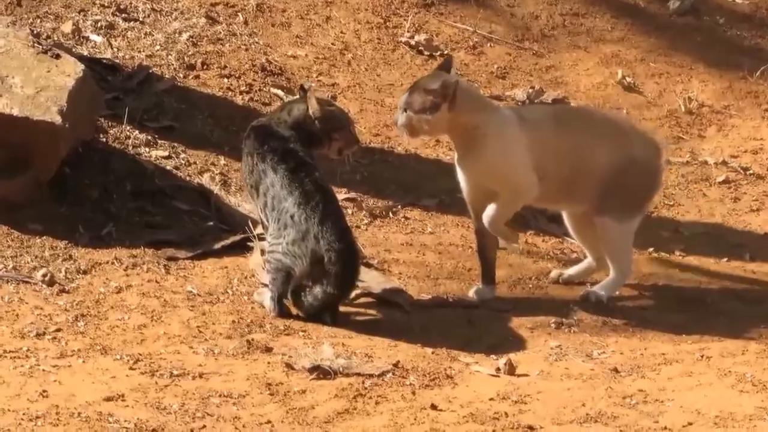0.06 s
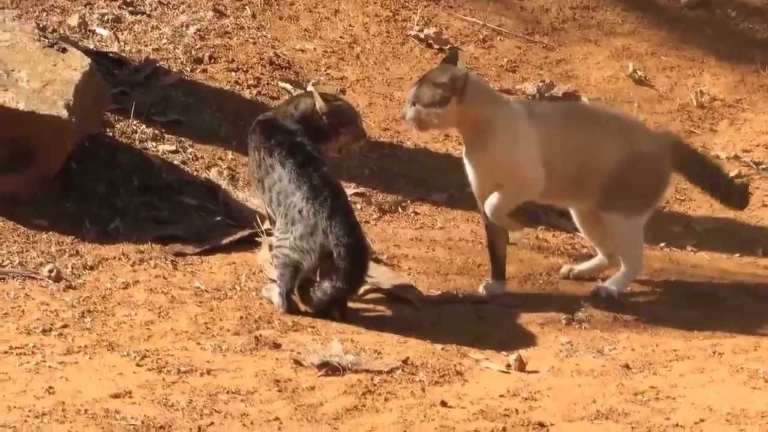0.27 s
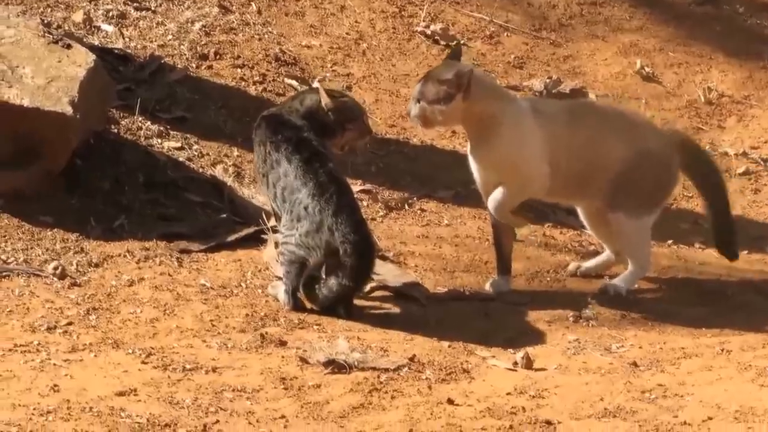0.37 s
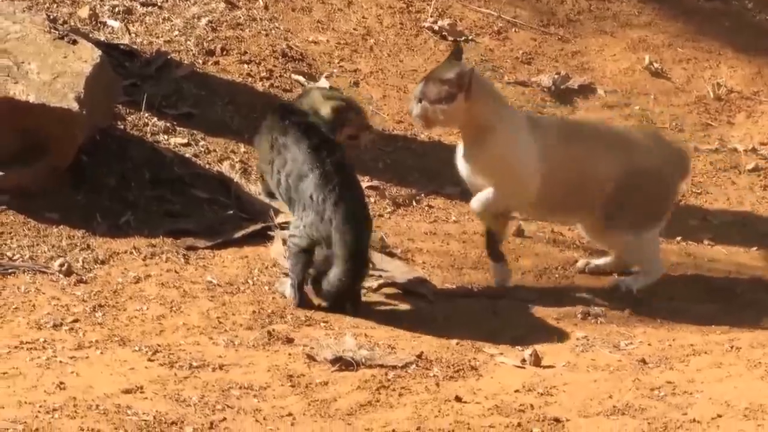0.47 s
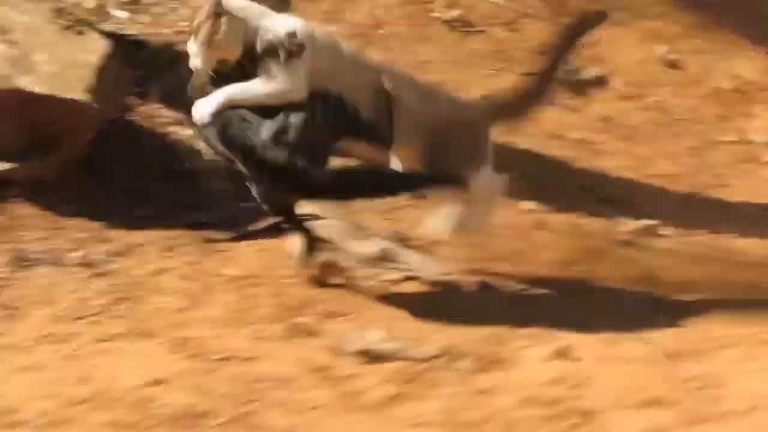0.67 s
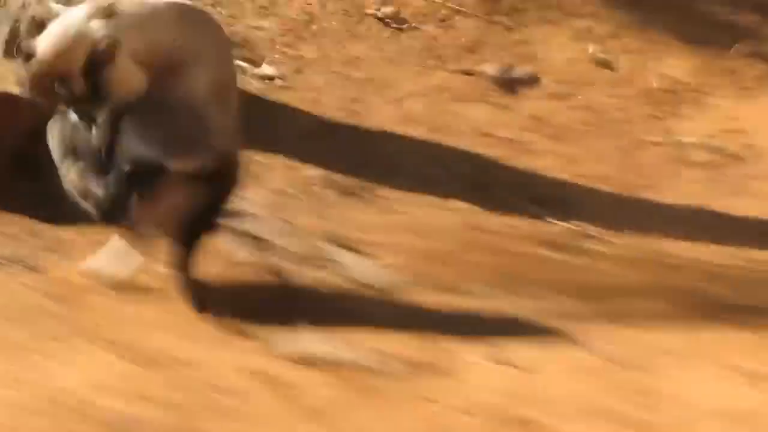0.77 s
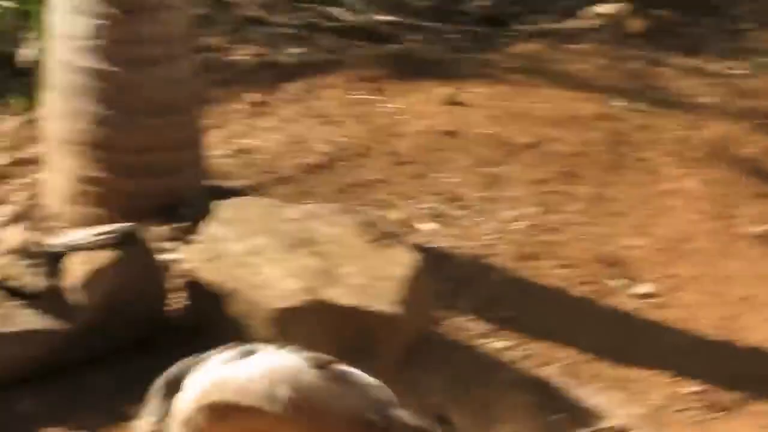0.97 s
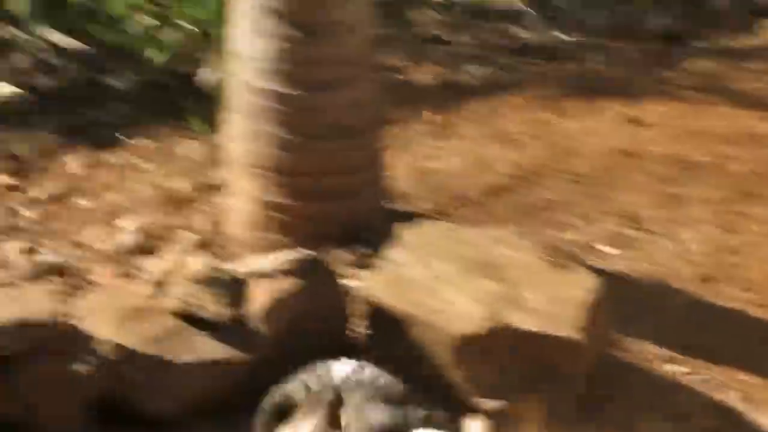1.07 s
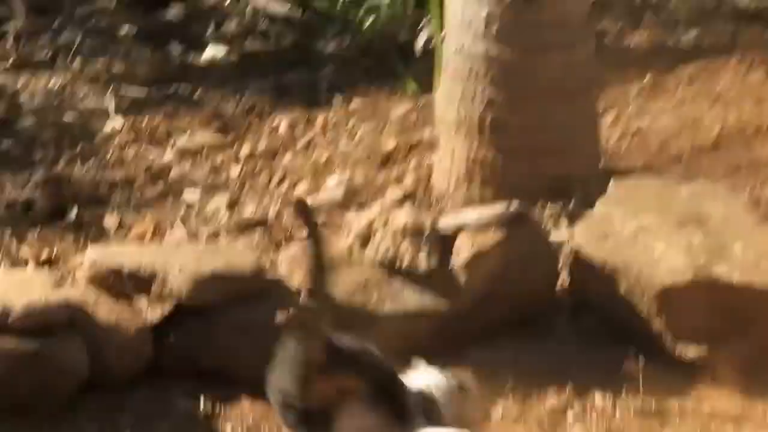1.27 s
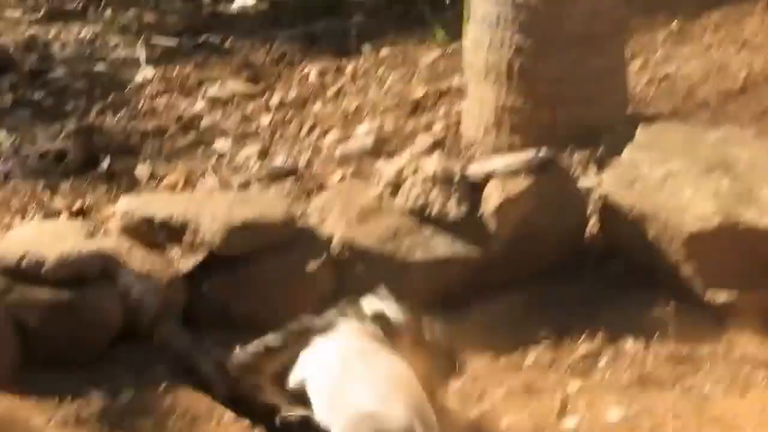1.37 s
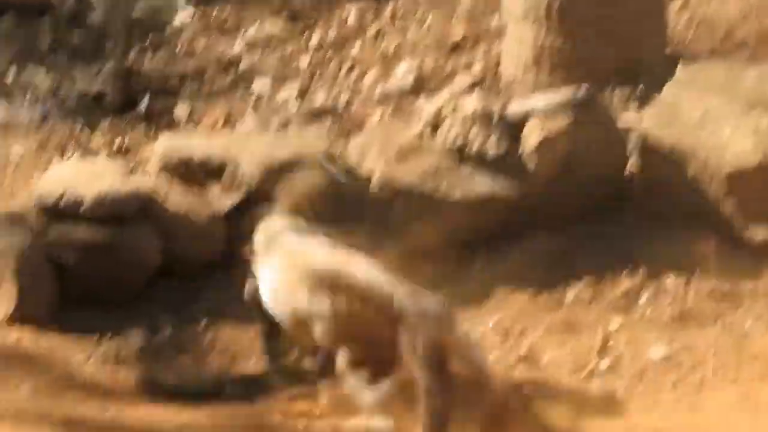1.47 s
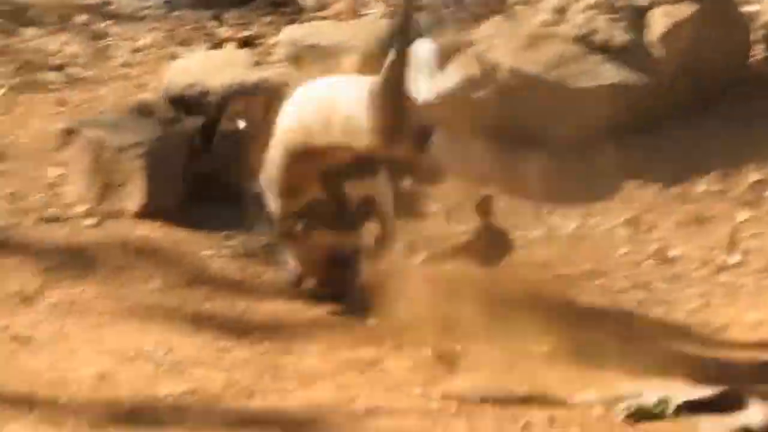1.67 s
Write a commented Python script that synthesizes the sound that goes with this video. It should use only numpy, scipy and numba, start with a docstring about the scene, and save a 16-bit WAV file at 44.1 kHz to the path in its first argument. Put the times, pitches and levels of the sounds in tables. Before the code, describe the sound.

A cat yowls, then shrieks, spits and snarls in a brief scuffle on dirt.

```python
"""Cat fight in a walled yard.

Two cats face off on dry dirt. Two vibrations in one throat make a rising yowl that splits into side
tones. An arching shriek breaks up into squeaks, then come a spitting screech and a lower snarl as they
scuffle: larynx pulses and turbulence, shaped by throat and mouth. Paws thud and scatter grit,
a far bird chirps, the walls echo, and a low rumble lies underneath."""
import sys
import numpy as np
from scipy import signal
from scipy.fft import rfft, irfft
from scipy.io import wavfile
from scipy.ndimage import uniform_filter1d
from numba import njit

SR = 44100
rng = np.random.default_rng(int(sys.argv[2]) if len(sys.argv) > 2 else 0)


def wav_out(sig):
    """Save sig, one row per channel (or a flat mono array), as 16-bit PCM at SR to the path in sys.argv[1]."""
    wavfile.write(sys.argv[1], SR, np.round(np.clip(np.atleast_2d(sig).T, -1, 1) * 32767).astype(np.int16))


N = 74970
TIME_S = np.arange(N) / SR
CUTOFF_HZ = 15700

# rumble and air: time_s, level_db
RUMBLE_LEVEL = [(0,-36.5),(.62,-35.5),(.72,-44),(.95,-48),(1.35,-46),(1.45,-44.5),(1.55,-42.5),(1.7,-42)]
# rumble spectrum: freq_hz, gain_db
RUMBLE_SPECTRUM = [(25,-19),(45,-12),(68,4.5),(88,-5.5),(120,5),(170,-8),(300,-8.5),(600,-5.5),(1200,-15),(2500,-19.5),(5000,-24.5),(11000,-34.5),(14000,-56)]
# rumble stereo width: freq_hz, side_minus_mid_db
RUMBLE_WIDTH = [(60,-22),(130,-12.5),(300,2),(8000,-3)]
# echo spectrum: freq_hz, gain_db
YARD_SPECTRUM = [(100,-1.5),(600,5.5),(1500,11.5),(4000,-1),(12000,5.5)]
# echo send; yowl and shriek onset nearly dry, later cries more echoing: time_s, gain_db
ECHO_SEND = [(.6,-17),(.69,-8),(.78,-2),(.9,0)]
# far bird: start_s, length_s, start_hz, end_hz, level_db
BIRD_CHIRPS = [(.295,.045,4520,2816,-39),(.431,0.011,2740,2380,-34.5)]

# scattered grit: time_s, level_db
GRIT_LEVEL = [(0,-69),(.55,-62),(.7,-54),(1.1,-48.5),(1.2,-53.5),(1.483,-55.5),(1.492,-41.5),(1.503,-53),(1.7,-47.5)]
# grit spectrum: freq_hz, gain_db
GRIT_SPECTRUM = [(300,10),(900,0.5),(6000,-4),(11000,-7.5),(14000,-22)]
# paws and bodies hitting dirt: start_s, level_db, centre_hz, length_s
DIRT_THUDS = [(0.917,-35.5,515,0.0065),(0.991,-42,1030,0.011),(1.489,-48,1460,0.007)]
# spit in an upper throat resonance: start_s, length_s, centre_hz, level_db
SPIT_BURSTS = [(0.628,0.066,5680,-23),(0.708,0.053,2310,-18),(0.739,0.065,4330,-19),(1.062,.05,4230,-37.5),(1.097,0.036,6870,-48),(1.196,0.02,4900,-54)]
# short gliding tones in the yowl and cries: start_s, length_s, start_hz, end_hz, level_db
SQUEAK_GLIDES = [(.055,0.0836,700,908,-38),(.125,.032,1002,1073,-30.5),(.16,0.034,828,1166,-29),(.646,0.027,3890,4272,-17),(.655,0.029,2247,2413,-9),(.733,0.025,1990,2100,-10.5),(.763,0.019,1980,2317,-11.5),(.82,0.017,2404,2120,-15),(.835,0.021,3900,3636,-14.5),(.85,0.053,1458,1254,-29),(.925,0.013,1333,1436,-28),(1.058,0.015,1082,1115,-22.5),(1.125,0.021,1193,1150,-23)]

# yowl, first vibration: time_s, pitch_hz, level_db
YOWL_CURVE = [(0,299.1,-56),(.06,349,-43),(.11,457.4,-36.5),(.15,524.1,-29),(.2,567,-32.5),(0.236,570.2,-40),(0.276,578.7,-30),(.305,582,-46),(.34,592.7,-29),(0.399,607.7,-35.5),(0.459,611.2,-20.5),(.55,616.6,-22.5),(0.649,621.8,-25),(.725,612.4,-33.5),(.745,590,-32)]
# throat strain, driving partials and rasp: time_s, gain_db
YOWL_STRAIN = [(0,-17.5),(.17,-10),(.205,-1.5),(.3,1.5),(.42,1.5),(.56,3),(.6,2.5),(0.658,5.5),(.72,-35),(.78,-43)]
# partials of the two vibrations: first_multiple, second_multiple, base_level_db
YOWL_PARTIALS = [(0,1,-45),(2,0,-40.5),(1,1,-46),(2,-1,-37),(2,1,-41),(3,-1,-49),(3,0,-46.5),(3,2,-49.5),(5,1,-52)]
# partials that swell: first_multiple, second_multiple, start_s, end_s, level_db
YOWL_SWELLS = [(2,0,.19,.28,-29),(1,1,.205,.265,-24.5),(1,1,.295,.42,-27),(2,-1,.38,.565,-22),(1,1,.48,.575,-30),(2,1,.47,.565,-32.5)]
# yowl rasp spectrum: freq_hz, gain_db
RASP_SPECTRUM = [(250,-37),(500,-11.5),(700,-2.5),(950,-4),(1300,-8.5),(1550,-8),(1850,-3.5),(2200,-17.5),(2700,-16),(3100,-18.5),(3500,-14.5),(4500,-39),(9000,-65)]
# yowl phase between the ears: freq_hz, left_lead_rad
YOWL_EAR_PHASE = [(600,-1.3),(900,-2.6),(1150,0)]

# shriek voicing: time_s, pitch_hz, level_db, roughness
SHRIEK_CURVE = [(.54,250,-47,.2),(.615,284,-36,.25),(.638,316,-21.5,.33),(.65,350,-17.5,.3),(.66,376,-15.5,.26),(.68,400,-18,.18),(.69,389,-18,.35),(.7,369,-15.5,.42),(.72,376,-16.5,.65),(.745,368,-17,.8),(.785,354,-23,.9),(.825,350,-23,.9),(.87,337,-42,.8)]
# shriek mouth filter: freq_hz, gain_db
SHRIEK_MOUTH = [(500,-29.5),(1050,-6),(1400,-13),(1900,-3.5),(2500,-1.5),(3300,-5),(4300,3.5),(5200,-12),(5900,-7.5),(6800,-13.5),(8500,-11.5),(9500,-22),(11500,-22.5),(15000,-63)]
# shriek throat resonance: time_s, centre_hz
SHRIEK_THROAT = [(.63,2500),(.655,2850),(0.676,2590),(.745,2220),(.848,2180)]
# screech voicing: time_s, pitch_hz, level_db, roughness
SCREECH_CURVE = [(.81,467.5,-29,0.79),(.845,465.4,-18,0.73),(.865,457.5,-19.5,0.74),(.88,449.6,-15,0.63),(.892,433.7,-23.5,.7),(.905,446.8,-19,0.74),(.955,437.8,-21.5,0.96),(.975,427.3,-25,0.86),(1.04,418.6,-30.5,0.91),(1.1,408,-28.5,0.97),(1.13,403,-60,0.8)]
# screech mouth filter: freq_hz, gain_db
SCREECH_MOUTH = [(500,-66),(900,-16),(1350,-2),(1650,-7),(2200,-0.5),(2900,0.5),(3800,-9),(4800,-11),(6200,-11),(7300,-10),(8300,-18.5),(11000,-17.5),(15000,-56)]
# screech throat resonance: time_s, centre_hz
SCREECH_THROAT = [(.84,4320),(.88,3500),(0.902,3000),(0.959,2420),(1.1,2480)]
# snarl voicing: time_s, pitch_hz, level_db, roughness
SNARL_CURVE = [(1,290.2,-39.5,1),(1.072,276.8,-29.5,.78),(1.14,284.9,-27,0.81),(1.165,282.1,-31,0.77),(1.197,284.8,-22.5,0.63),(1.235,279.7,-31,0.68),(1.25,276,-39,0.81),(1.285,281,-37,0.87),(1.34,271,-54,0.69)]
# snarl mouth filter: freq_hz, gain_db
SNARL_MOUTH = [(300,-26.5),(500,-11.5),(680,-22.5),(850,-3),(1150,-7.5),(1600,-5),(2200,-7),(2950,-12.5),(3600,-24.5),(4900,-21.5),(6200,-40),(11000,-50),(15000,-59)]
# snarl throat resonance: time_s, centre_hz
SNARL_THROAT = [(1.059,1130),(1.191,1220),(1.208,1770)]


def from_db(db):
    """Decibels to gain."""
    return 10 ** (np.asarray(db) / 20)


def unit_rms(x):
    """Scale to unit power."""
    return x / np.sqrt(np.mean(x ** 2) + 1e-20)


def curves(rows):
    """Each column after time_s, interpolated per sample."""
    time_s, *columns = np.transpose(rows)
    return [np.interp(TIME_S, time_s, column) for column in columns]


def gate(start_s, end_s, edge_s):
    """Gate with linear edges."""
    return np.clip(np.minimum(TIME_S - start_s, end_s - TIME_S) / edge_s + .5, 0, 1)


def filtered(x, spectrum):
    """Filter by rows of freq_hz, gain_db."""
    freq_hz, gain_db = np.transpose(spectrum)
    size = 2 * x.shape[-1]
    bins_hz = np.maximum(np.fft.rfftfreq(size, 1 / SR), 1)
    gain = from_db(np.interp(np.log(bins_hz), np.log(freq_hz), gain_db))
    return irfft(rfft(x, size) * gain, size)[..., :size // 2]


def drift(corner_hz):
    """Low-passed noise, unit RMS."""
    bins_hz = np.fft.rfftfreq(N, 1 / SR)
    return unit_rms(irfft(rfft(rng.standard_normal(N)) / (1 + (bins_hz / corner_hz) ** 2), N))


def phase_rad(pitch_hz):
    """Running phase of a pitch curve."""
    return 2 * np.pi * np.cumsum(pitch_hz) / SR


def levelled(x):
    """Hold unit RMS over about 16 ms."""
    return x / np.sqrt(np.abs(uniform_filter1d(x * x, size=700)) + 1e-12)


def panned(x, pan_db):
    """Mono to stereo; pan_db is left minus right."""
    gains = from_db([[pan_db / 2], [-pan_db / 2]])
    return x * gains / gains.mean()


@njit
def resonate(x, centre_hz, width_hz):
    """Two-pole band-pass, per-sample centre, unit peak gain."""
    radius = np.exp(-np.pi * width_hz / SR)
    feedback = 2 * radius * np.cos(2 * np.pi * centre_hz / SR)
    gain = (1 - radius ** 2) / 2
    y = np.zeros(len(x))
    for i in range(2, len(x)):
        y[i] = gain * (x[i] - x[i - 2]) + feedback[i] * y[i - 1] - radius ** 2 * y[i - 2]
    return y


def glides(rows, jitter):
    """Short gliding sines that swell and fade."""
    out = 0
    for start_s, length_s, start_hz, end_hz, level_db in rows:
        progress = np.clip((TIME_S - start_s) / length_s, 0, 1)
        pitch_hz = (start_hz + (end_hz - start_hz) * progress) * (1 + jitter * drift(152.4))
        out = out + from_db(level_db) * np.sin(np.pi * progress) * np.sin(phase_rad(pitch_hz))
    return out


def rumble():
    """Far rumble and air: mid/side noise whose level dips midway."""
    mid, side = unit_rms(filtered(rng.standard_normal((2, N)), RUMBLE_SPECTRUM))
    return from_db(curves(RUMBLE_LEVEL)[0]) * (mid + filtered(side, RUMBLE_WIDTH) * [[1], [-1]])


def yard_echo(x, early_db=-2.5, early_decay_s=0.013, reflections_per_s=3000, tail_db=-10.5, t60_s=0.63):
    """Quick reflections off ground and stones, then a diffuse tail; each side has its own."""
    early = rng.standard_normal((2, N)) * (rng.random((2, N)) < reflections_per_s / SR)
    early_fade = np.exp(-TIME_S / early_decay_s)
    tail = rng.standard_normal((2, N)) * from_db(-60 * TIME_S / t60_s) * (1 - early_fade)
    response = from_db(early_db) * unit_rms(early * early_fade) + from_db(tail_db) * unit_rms(tail)
    return signal.fftconvolve(x, filtered(response / np.sqrt(N), YARD_SPECTRUM), axes=1)[:, :N]


def bird():
    """Falling chirps of a far bird."""
    return panned(glides(BIRD_CHIRPS, jitter=0.0156), pan_db=-3)


def scuffle(grains_per_s=1500, grain_spread_db=4):
    """Paws spray grit as random clicks; impacts on dirt thud as narrow-band noise."""
    sizes = from_db(grain_spread_db * np.minimum(rng.exponential(1, (2, N)), 5))
    grains = sizes * rng.choice([-1, 1], (2, N)) * (rng.random((2, N)) < grains_per_s / SR)
    grit = filtered(grains + .5 * grains[::-1], GRIT_SPECTRUM)   # left/right crossfeed
    out = unit_rms(grit) * from_db(curves(GRIT_LEVEL)[0])
    for start_s, level_db, centre_hz, length_s in DIRT_THUDS:
        thud = resonate(rng.standard_normal(N), np.full(N, float(centre_hz)), .15 * centre_hz)
        age = np.maximum(TIME_S - start_s, 0) / (length_s / 3)
        out = out + from_db(level_db) * levelled(thud) * age * np.exp(1 - age)
    return out


def spits(width_hz=810, rattle_hz=135, rattle_db=1):
    """Rattling puffs of air through one steep throat resonance."""
    out = 0
    for start_s, length_s, centre_hz, level_db in SPIT_BURSTS:
        air = rng.standard_normal(N)
        for _ in range(2):
            air = resonate(air, np.full(N, float(centre_hz)), width_hz)
        swell = np.sin(np.pi * np.clip((TIME_S - start_s) / length_s, 0, 1))
        out = out + from_db(level_db) * swell * levelled(air * from_db(rattle_db * drift(rattle_hz)))
    return panned(out, pan_db=-3)


def squeaks():
    """Short gliding tones: the yowl's opening scoops, then squeaks and brief rings in the cries."""
    return panned(glides(SQUEAK_GLIDES, jitter=0.01797), pan_db=-8)


def throat_smear(x, decay_s=0.002):
    """All-pass ringing: each pulse lingers in the throat."""
    ringing = rfft(rng.standard_normal(N) * np.exp(-TIME_S / decay_s))
    return irfft(rfft(x) * ringing / (np.abs(ringing) + 1e-12), N)


def larynx(pitch_hz, roughness, jitter):
    """Uneven pulses, giving way to turbulent puffs as roughness goes from 0 to 1."""
    phase = phase_rad(pitch_hz * (1 + jitter * roughness ** 2 * drift(150)))
    pulses = sum(np.cos(k * phase) * (k * pitch_hz < CUTOFF_HZ) for k in range(1, 40))
    puffs = rng.standard_normal(N) * (1 + np.cos(phase))
    voiced = np.sqrt(1 - roughness ** 2) * unit_rms(throat_smear(pulses))
    return voiced + roughness * unit_rms(throat_smear(puffs))


def yowl_partial(pitch_hz, shimmer_db=1.8):
    """One shimmering sine; low pitches reach the ears out of step."""
    lead_rad = np.interp(pitch_hz, *np.transpose(YOWL_EAR_PHASE))
    return from_db(shimmer_db * drift(16)) * np.sin(phase_rad(pitch_hz) + lead_rad * [[.5], [-.5]])


def yowl(second_start_hz=331, second_rise_hz_per_s=37, jitter=.003, rasp_base_db=-36.5, edge_s=0.014):
    """Two vibrations in one throat give a clear tone, sum and difference tones, and rasp."""
    pitch_hz, level_db = curves(YOWL_CURVE)
    strain = from_db(curves(YOWL_STRAIN)[0]) * gate(-1, YOWL_STRAIN[-1][0], edge_s)
    first_hz = pitch_hz * (1 + jitter * drift(51))
    second_hz = (second_start_hz + second_rise_hz_per_s * TIME_S) * (1 + jitter * drift(49))
    tone = from_db(level_db) * yowl_partial(first_hz) * gate(-1, YOWL_CURVE[-1][0], edge_s)
    partials = 0
    for first_multiple, second_multiple, base_db in YOWL_PARTIALS:
        gain = from_db(base_db) * strain
        for *multiples, start_s, end_s, swell_db in YOWL_SWELLS:
            if multiples == [first_multiple, second_multiple]:
                gain = np.maximum(gain, from_db(swell_db) * gate(start_s, end_s, edge_s))
        partial_hz = first_multiple * first_hz + second_multiple * second_hz
        partials = partials + gain * yowl_partial(partial_hz)
    subharmonic = larynx(pitch_hz / 2, roughness=0.663, jitter=0.0845)
    rasp = from_db(rasp_base_db) * strain * unit_rms(filtered(subharmonic, RASP_SPECTRUM))
    return panned(tone, pan_db=1) + panned(partials + rasp, pan_db=-8)


def cry(curve, mouth, throat, throat_db, width_hz, jitter, flutter_db, flutter_hz, pan_db):
    """Harsh cry: larynx through the mouth and a moving throat resonance, with a rattling level."""
    pitch_hz, level_db, roughness = curves(curve)
    voice = filtered(larynx(pitch_hz, roughness, jitter), mouth)
    voice = voice + from_db(throat_db) * resonate(voice, curves(throat)[0], width_hz)
    voice = levelled(voice * from_db(flutter_db * roughness * drift(flutter_hz)))
    envelope = from_db(level_db) * gate(curve[0][0], curve[-1][0], edge_s=0.0071)
    return panned(voice * envelope, pan_db)


def scene():
    """Yowl, three cries, scuffle and bird in the yard, over the rumble."""
    shriek = cry(SHRIEK_CURVE, SHRIEK_MOUTH, SHRIEK_THROAT, throat_db=9.5, width_hz=450,
                 jitter=0.1124, flutter_db=1, flutter_hz=89, pan_db=-4)
    screech = cry(SCREECH_CURVE, SCREECH_MOUTH, SCREECH_THROAT, throat_db=17, width_hz=1430,
                  jitter=.18, flutter_db=2.5, flutter_hz=90, pan_db=-2.5)
    snarl = cry(SNARL_CURVE, SNARL_MOUTH, SNARL_THROAT, throat_db=-6.5, width_hz=410,
                jitter=.2, flutter_db=3.5, flutter_hz=70.4, pan_db=-3.5)
    fight = shriek + screech + snarl + spits() + squeaks() + scuffle()
    chirps = bird()
    cats = yowl() + fight
    echo = yard_echo(chirps + from_db(curves(ECHO_SEND)[0]) * cats)
    return cats + chirps + echo + rumble()


def record(dry):
    """Soft clip, then steep low-pass."""
    lowpass = signal.cheby2(12, 70, CUTOFF_HZ, fs=SR, output="sos")
    return signal.sosfilt(lowpass, 1.272 * np.tanh(dry / 1.373))


dry = scene()
out = record(dry)
wav_out(out)
```